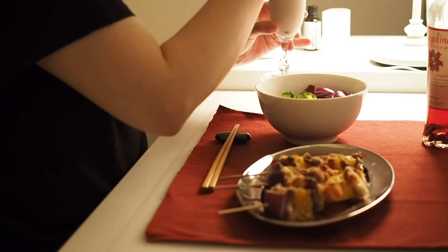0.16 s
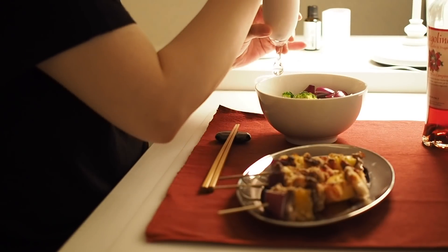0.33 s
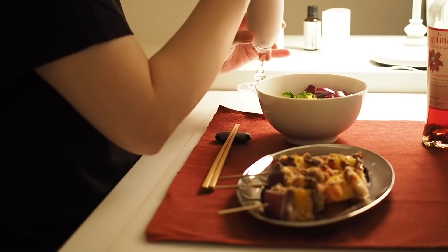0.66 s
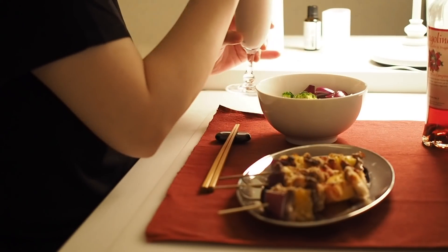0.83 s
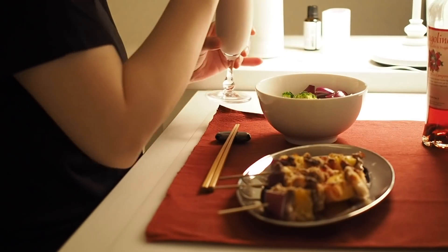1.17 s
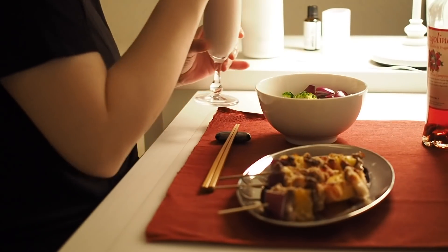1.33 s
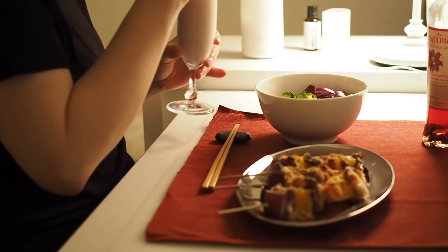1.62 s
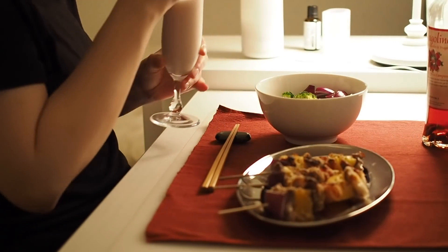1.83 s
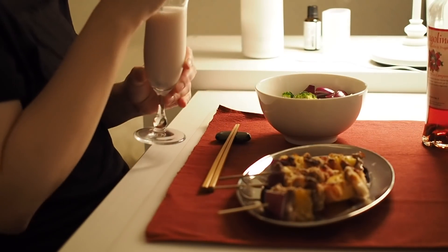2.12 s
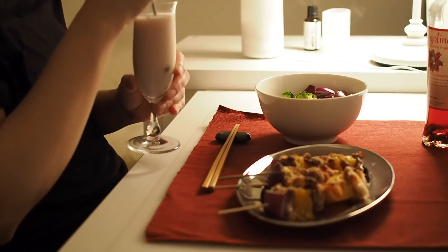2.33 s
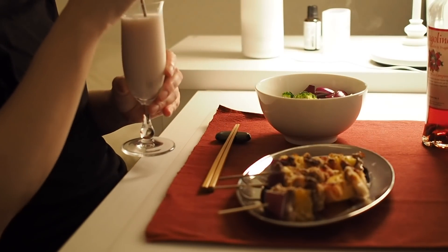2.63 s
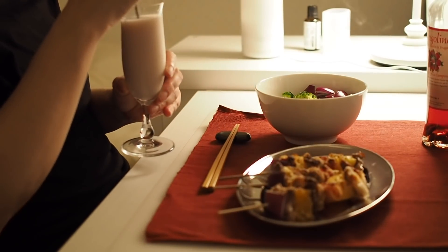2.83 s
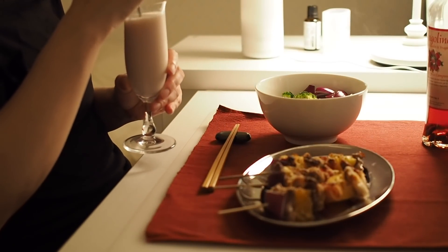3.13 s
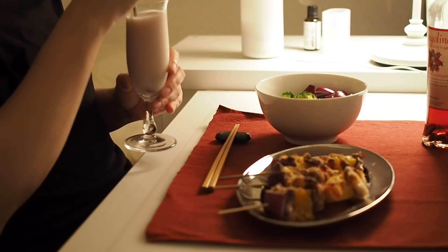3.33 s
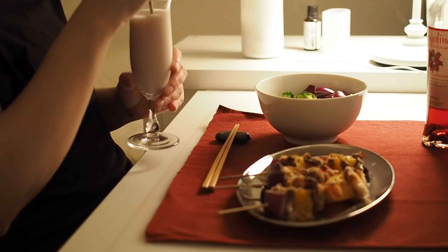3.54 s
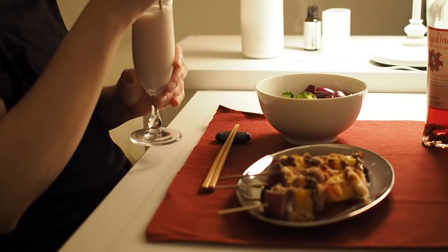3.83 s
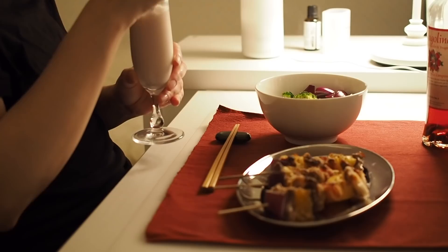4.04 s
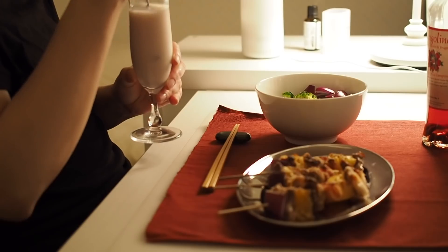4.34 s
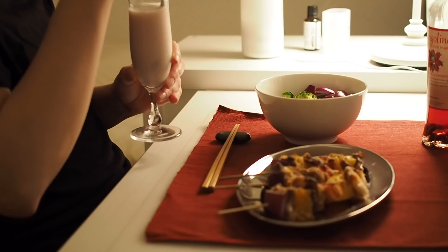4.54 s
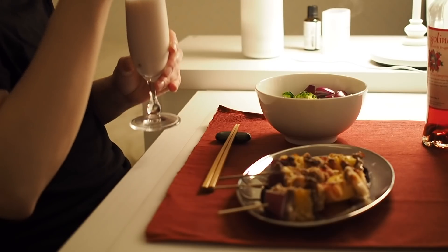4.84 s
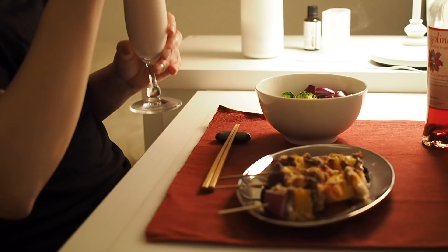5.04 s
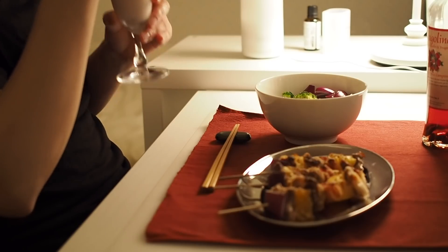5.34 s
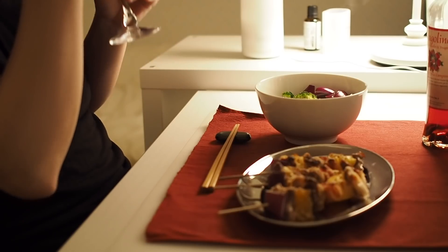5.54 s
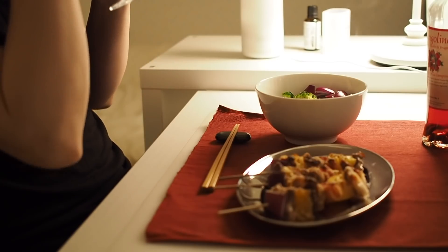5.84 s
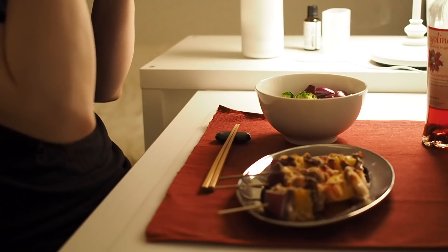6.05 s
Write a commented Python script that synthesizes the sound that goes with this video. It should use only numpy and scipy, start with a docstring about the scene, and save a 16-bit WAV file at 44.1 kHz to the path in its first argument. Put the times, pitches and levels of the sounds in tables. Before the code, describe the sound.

In a quiet room at home, a spoon taps irregularly against the inside of a stemmed glass, heard close up in stereo. The small, bright clinks bunch together early, then thin out among barely audible slides. The loudest tap comes past the middle and is cut short. Sparse clinks and a dull tick end it as the glass is raised. Each has a short echo over soft rumble, wavering hum and hiss.

```python
"""A long spoon stirs a thick drink in a stemmed glass, close to a pair of microphones. It taps the wall,
hard or barely, ringing the modes of glass and spoon, and slides along it so that friction makes them sing.
The glass, lifted, gives a last, duller tick. A small furnished room answers each tap, over a low rumble,
a wavering hum and the hiss of the two microphones."""
import sys
import numpy as np
from scipy import signal
from scipy.io import wavfile
from scipy.ndimage import uniform_filter1d

SR = 44100
rng = np.random.default_rng(int(sys.argv[2]) if len(sys.argv) > 2 else 0)


def log_audio(samples):
    """Write samples as a 16-bit WAV file to the path given in sys.argv[1]."""
    # one column per channel
    frames = np.atleast_2d(samples).T
    # limit to full scale, then quantise
    limited = np.clip(frames, -1, 1)
    pcm = np.round(limited * 32767).astype(np.int16)
    wavfile.write(sys.argv[1], SR, pcm)


N = 272538


def gain_of(db):
    return 10 ** (np.asarray(db) / 20)


def unit_rms(x):
    return x / np.sqrt(np.mean(x ** 2) + 1e-20)


def curve_at(points, hz):
    """Interpolates (Hz, value) points along a logarithmic frequency axis."""
    point_hz, value = np.transpose(points)
    return np.interp(np.log(hz + 1), np.log(point_hz + 1), value)


def add(mix, start_s, sound):
    part = mix[:, round(start_s * SR):][:, :sound.shape[1]]
    part += sound[:, :part.shape[1]]


def microphone_pair(draws, likeness):
    """Left and right noise spectra from four normal draws, correlated by `likeness` in each bin."""
    likeness = np.clip(likeness, -1, 1)[:, None]
    left, unrelated = draws[0] + 1j * draws[1], draws[2] + 1j * draws[3]
    return np.array([left, likeness * left + np.sqrt(1 - likeness ** 2) * unrelated])


def room_tone():
    """The room's low rumble and the microphones' hiss: steady noise with faint drifting patches."""
    # noise spectrum: frequency_hz, relative_density_db
    spectrum = [(15, -43), (32, -22), (55, -2.5), (74, -3), (108, -7), (226, -5.5), (252, -7.5),
                (313, -9.5), (470, -8), (669, -14), (854, -13), (2460, -24.5), (3510, -25), (4130, -27.5),
                (15200, -34), (16500, -65)]
    # likeness of the noise at the two microphones: frequency_hz, correlation
    likeness = [(60, 0.69), (130, 0.47), (290, 0.85), (640, 0.75), (1410, 0.68), (3100, 0.14),
                (6820, 0.046), (15000, 0.0071)]
    level_db, patch_db = -58.5, 1.08
    frames, hz = N // 512 + 5, np.fft.rfftfreq(2048, 1 / SR)
    draws = rng.standard_normal((frames, 1025, 5)).T
    patches = unit_rms(uniform_filter1d(uniform_filter1d(draws[4], 20, axis=0), 12, axis=1))
    spectra = microphone_pair(draws, curve_at(likeness, hz))
    spectra *= gain_of(curve_at(spectrum, hz)[:, None] + patch_db * patches)
    noise = signal.istft(spectra, nperseg=2048, noverlap=1536)[1][:, :N]
    return gain_of(level_db) * unit_rms(noise)


def hum():
    """A low tone that swells and wavers, the same at both microphones."""
    # course of the pitch: time_s, pitch_hz
    pitches = [(0, 80), (4.0, 80.5), (4.3, 82.5), (5.25, 82.2), (6.18, 75)]
    # swells: time_s, level_db
    swells = [(0.0, -67), (0.4, -85), (1.01, -71.5), (2.1, -88), (2.3, -67.5), (2.67, -63.5), (3.05, -71),
              (3.25, -64), (3.4, -79), (4.1, -76), (4.25, -57.5), (4.44, -70.5), (4.88, -60), (4.99, -83),
              (5.22, -56.5), (5.42, -65), (5.68, -63), (5.94, -63.5), (6.18, -66)]
    waver_hz, waver_db = 1.33, 0.5
    t = np.arange(N) / SR

    def drift():
        return unit_rms(sum(np.sin(2 * np.pi * (f * t + rng.random())) for f in np.geomspace(1.1, 6, 8)))

    hz = np.interp(t, *np.transpose(pitches)) + waver_hz * drift()
    level_db = np.interp(t, *np.transpose(swells)) + waver_db * drift()
    return np.sqrt(2) * gain_of(level_db) * np.sin(2 * np.pi * np.cumsum(hz) / SR)


def room_echoes(source):
    """Dense echoes build up and die, each band at its own speed; three tails alternate as the glass moves."""
    # decay of the small furnished room: frequency_hz, t60_s
    decay = [(800, 0.5), (2100, 0.21), (5500, 0.27), (14700, 0.13)]
    # likeness of the echoes at the two microphones: frequency_hz, correlation
    likeness = [(300, 0.77), (2500, 1), (6800, 0.62), (15000, 0.16)]
    level_db, rise_s, turn_hz = -2.5, 0.0048, 0.888
    hz, frame_s = np.fft.rfftfreq(128, 1 / SR), np.arange(700) * 32 / SR
    fade = gain_of(-60 * frame_s / curve_at(decay, hz)[:, None])
    turn = 2 * np.pi * turn_hz * np.arange(N) / SR
    out = np.zeros((2, N))
    for k in range(3):
        spectra = microphone_pair(rng.standard_normal((700, 65, 4)).T, curve_at(likeness, hz))
        tail = signal.istft(spectra * fade, nperseg=128, noverlap=96)[1]
        tail *= 1 - np.exp(-np.arange(tail.shape[1]) / SR / rise_s)
        tail /= np.linalg.norm(tail[0])
        share = np.sqrt(2 / 3) * np.cos(turn + k * np.pi / 3)
        out += signal.fftconvolve((source * share)[None], tail, axes=1)[:, :N]
    return gain_of(level_db) * out


def spoon_slides():
    """Friction on the wall feeds a few modes unevenly; each slide swells, holds in contact and dies away."""
    # slides along the wall: loudest_at_s, level_db, hold_s
    slides = [(0.686, -77.5, 0.033), (1.056, -74.5, 0.02), (2.482, -67.5, 0.039), (2.8, -67.5, 0.021),
              (3.05, -71.5, .05), (3.36, -65.5, 0.024), (3.695, -72.5, 0.028), (4.22, -69, 0.06)]
    # modes that sing under friction: pitch_hz, relative_db
    singing_modes = [(3390, -11), (3425, -8), (3548, 0), (4322, -13), (7712, -18)]
    rise_db_per_s, fall_db_per_s = 598, 232
    hz, db = np.transpose(singing_modes)
    t = np.arange(-SR // 10, SR // 3) / SR
    out = np.zeros((2, N))
    for loudest_at_s, level_db, hold_s in slides:
        friction = rng.standard_normal((2, len(hz), len(t)))
        real, imag = uniform_filter1d(uniform_filter1d(friction, 800), 800)
        feed = 0.82 + unit_rms(real) + 1j * unit_rms(imag)  # a steady part and a slow random one
        song = (gain_of(db)[:, None] * feed * np.exp(2j * np.pi * hz[:, None] * t)).real.sum(0)
        shape_db = np.minimum(rise_db_per_s * t, 0) - fall_db_per_s * np.maximum(t - hold_s, 0)
        slide = unit_rms(song) * gain_of(level_db + shape_db)
        add(out, loudest_at_s + t[0], np.tile(slide, (2, 1)))
    return out


def mode_bank(hz, t60_s):
    """Freely ringing modes: one dying complex tone a row, half a second long."""
    t = np.arange(SR // 2) / SR
    decay_per_s = np.log(1000) / np.maximum(t60_s, 0.02)
    return np.exp((2j * np.pi * hz[:, None] - decay_per_s[:, None]) * t)


def strike(bank, hz, db, grip_db_per_s):
    """A blow sets every mode going; near surfaces fill the sound in and the grip damps it."""
    attack_s, fill_s = 0.00031, 0.0029
    t = np.arange(bank.shape[1]) / SR
    phase, scatter = rng.random((2, len(hz)))
    # turns by which the left microphone leads, more scattered in the treble
    lead = (scatter - 0.5) * 0.64 * (hz / 11000) ** 1.4
    drive = gain_of(db) * np.exp(2j * np.pi * (phase + np.outer([0.5, -0.5], lead)))
    rise = (1 - 0.22 * np.exp(-t / fill_s)) * (1 - np.exp(-t / attack_s))
    return (drive @ bank).real * rise * gain_of(-max(grip_db_per_s, 0) * t)


def glass_taps():
    """Where the spoon lands sets how hard each clear mode rings; the dense ones are driven by chance."""
    # spoon on glass: start_s, level_db, contact (four columns, roughly -1..1: height, place round the
    # wall, place along the spoon, tilt), grip_db_per_s, dense_db (against the strongest clear mode)
    taps = [(0.0, -73, -0.25, -0.53, 0.6, 0.71, 5, -25), (0.22, -77.5, -0.26, -0.26, -1.2, 0.29, 5.6, -17),
            (0.3445, -57.5, 0.33, 0.29, -0.25, -0.39, 4.4, -23.5),
            (0.8931, -60.5, -0.035, 0.27, -1.08, 0.97, 30, -22.5),
            (1.3025, -49, 0.98, -0.34, 0.16, -0.0019, 5, -10.5),
            (1.311, -46, 0.92, -0.37, 0.039, 0.27, 5, -14),
            (1.328, -44.5, 0.83, 0.12, 0.13, 0.021, 5.9, -19),
            (1.5596, -41.5, -0.65, 0.06, 0.72, 0.096, 3.4, -7.5),
            (1.905, -53, 0.31, -0.081, 0.041, -1.16, 6.9, -20),
            (2.0917, -59, -0.041, -0.078, -0.52, -0.091, 5, -8),
            (2.2234, -51.5, 0.56, -0.38, 0.55, -1.07, 3.5, -18),
            (2.565, -65.5, -0.29, 0.25, -0.21, -0.52, 5, -11.5),
            (2.606, -74, 0.21, -1.6, -0.067, 0.27, 30, -28), (2.88, -80, -0.14, -0.12, -0.14, -0.8, 5, -19),
            (3.15, -72.1, 0.17, -0.16, -0.063, -0.026, 5, -12.5),
            (3.5268, -65, -0.092, 0.58, -0.7, 0.26, 5, -13.5),
            (3.74, -78.5, -0.18, -0.3, 0.61, -0.58, 5, -13),
            (3.849, -34.5, -0.72, -0.86, 0.89, -0.24, 170, -8),
            (4.037, -62.5, -0.12, -0.21, 0.26, 0.00048, 5, -10),
            (4.174, -66, 0.22, -0.68, 0.42, 0.13, 5, -25),
            (4.6647, -50.5, -0.075, -0.99, 0.16, 1, 180, -22.5),
            (5.654, -48, -0.3, -0.27, -0.6, -0.017, 25, -18)]
    # clear modes of glass and spoon together: pitch_hz
    clear_hz = [1010, 2612, 3390, 3420, 3543, 4322, 4447, 4497, 4642, 4860, 5550, 6455, 7065, 7625, 7710,
                7818, 8100, 8612, 9000, 9670, 10385, 10685, 11255, 11700, 12360, 12710, 13440, 13805, 14670,
                15120]
    # the same modes: relative_db, t60_s, then db_per_unit of each of the four contact columns
    clear_modes = [(-14.5, 0.073, -14, 0, -7, 6.5), (-17.5, 0.33, 4, -4.5, 4, 13),
                   (-1.5, 0.29, 2, 12, 6.5, 5), (-0.7, 0.34, 0.7, 6, 10.5, 4.5),
                   (-0.7, 0.19, 8, 19.5, 0.3, -9), (-3.5, 0.13, -1, -11, 0.5, 4),
                   (-8.5, 0.09, -7, 0, 12, 8), (-13, 0.59, -1, 17, 1, -3), (-8.5, 0.32, -14, -0.5, -6, 3.5),
                   (-31.5, 0.077, -14, -1, 15, -1), (-7, 0.19, 13.6, 2, 0.5, -5.5),
                   (-10.9, 0.14, -7, 0.5, 3, 1.5), (-5, 0.12, 2, 7.5, -11, 9.5),
                   (-12, 0.085, 17.5, -5, 8, 0.5), (1, 0.1, -4.5, 0.5, -0.5, -13),
                   (-24.5, 0.15, -16, -1, 16, -6), (-21, 0.12, -4, 4, 27, 2), (-9, 0.13, -4, 18, 6, 17),
                   (-13, 0.14, 10, 4, 6, 11), (-8.5, 0.11, 13, 1, -8.5, 12), (-20, 0.38, -7, -10, 0.5, -10),
                   (-9.5, 0.14, -8, 26, -2.8, -2), (-29, 0.21, 0, -13, 14, 8),
                   (-29, 0.15, -10, 1, 0.7, -3.9), (-5.5, 0.12, -9, 11, -2, 8),
                   (-24, 0.13, 0, 10, -3.0, 1.4), (-14.5, 0.19, -14, 5, 12, -9), (-21, 0.17, -6, -5, -4, 1),
                   (-8, 0.14, 0, 17, -3.3, -11), (-20.5, 0.19, -10, -5.3, 11, -8)]
    # spectrum of the many weaker modes between the clear ones: frequency_hz, relative_db
    dense_spectrum = [(1400, -19), (1700, -18), (2400, -16), (3000, -24), (3450, -10), (3950, -21),
                      (4900, 0), (5500, -8), (6050, -24), (6700, -6), (8300, -1), (10500, -4), (12000, -9),
                      (13500, -6), (14300, -13), (15200, -8), (16500, -22)]
    # their decay: frequency_hz, t60_s
    dense_decay = [(1500, 0.061), (4000, 0.14), (9000, 0.062), (15000, 0.15)]
    # their brightening: db_per_octave for one unit of each contact column
    brightening = (0.077, 0.33, 0.53, 0.5)
    # tick of the lifted glass: start_s, level_db, grip_db_per_s, dense_db, bright_db_per_octave
    last_tick = [(6.1059, -55.5, 12, -12.5, -3.5)]
    # modes of the glass held and tilted: pitch_hz, relative_db, t60_s
    held_modes = [(2670, -19, 0.37), (3400, -6.5, 0.43), (4090, -7, 0.25), (4700, -4, 0.23),
                  (4800, -6, 0.2), (5430, -8, 0.5), (6950, 10, 0.046), (7700, -17, 0.21), (8250, 5, 0.11),
                  (9300, 3.5, 0.15), (10340, 0, .13), (10900, -12, 0.08), (12770, -2, 0.15),
                  (13810, -14, .15)]
    out = np.zeros((2, N))
    dense_hz = np.linspace(1450, 15700, 85) + rng.uniform(-75, 75, 85)
    dense_bank = mode_bank(dense_hz, curve_at(dense_decay, dense_hz))

    def tap(hz, bank, driven_db, grip_db_per_s, dense_db, bright_db_per_octave):
        colour_db = curve_at(dense_spectrum, dense_hz) + bright_db_per_octave * np.log2(dense_hz / 6000)
        chance_db = driven_db.max() + dense_db + colour_db + 4.0 * rng.standard_normal(len(dense_hz))
        clear_ring = strike(bank, hz, driven_db, grip_db_per_s)
        return clear_ring + strike(dense_bank, dense_hz, chance_db, grip_db_per_s)

    hz = np.array(clear_hz)
    db, t60_s, *mode_shapes = np.transpose(clear_modes)
    bank = mode_bank(hz, t60_s)
    for start_s, level_db, *contact, grip_db_per_s, dense_db in taps:
        driven_db = level_db + db + np.dot(contact, mode_shapes)
        add(out, start_s, tap(hz, bank, driven_db, grip_db_per_s, dense_db, np.dot(contact, brightening)))
    hz, db, t60_s = np.transpose(held_modes)
    for start_s, level_db, *timbre in last_tick:
        add(out, start_s, tap(hz, mode_bank(hz, t60_s), level_db + db, *timbre))
    return out


def scene():
    """The glass close up, with the room's echoes, room tone and hum behind it."""
    close = glass_taps() + spoon_slides()
    return close + room_echoes(close.mean(0)) + room_tone() + hum()


def record(dry):
    """The recorder cuts the highest treble and adds a small steady offset."""
    edge_hz, offset = 15900, -0.00073
    lowpass = signal.firwin(511, edge_hz, window=("kaiser", 9), fs=SR)
    return signal.oaconvolve(dry, lowpass[None], "same") + offset


dry = scene()
out = record(dry)
log_audio(out)
```